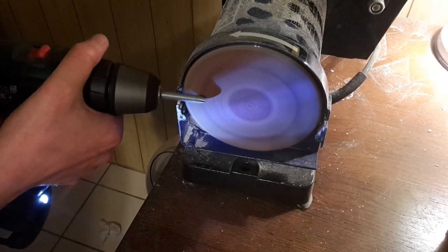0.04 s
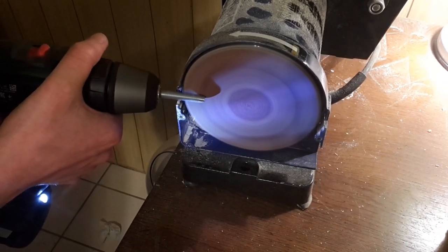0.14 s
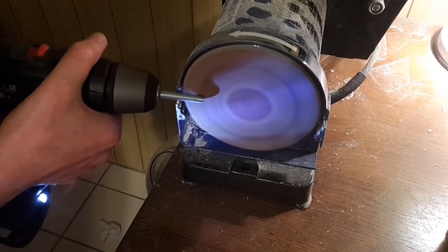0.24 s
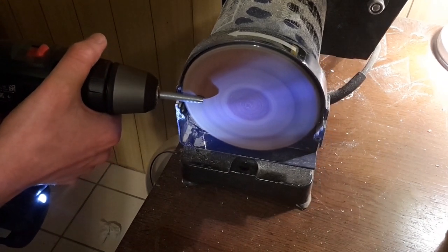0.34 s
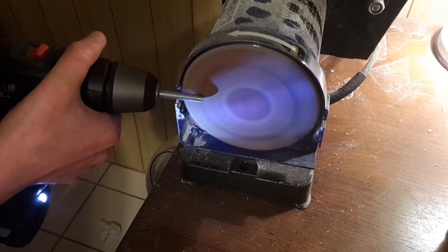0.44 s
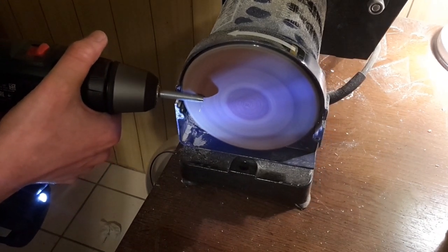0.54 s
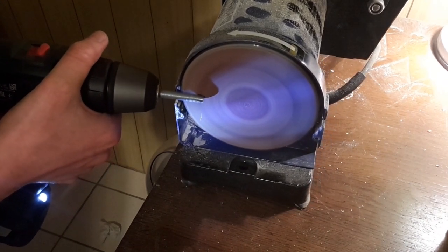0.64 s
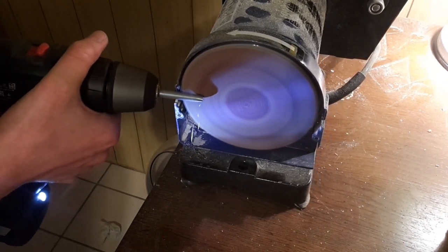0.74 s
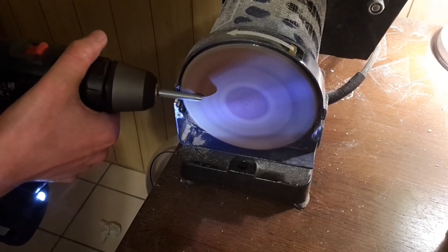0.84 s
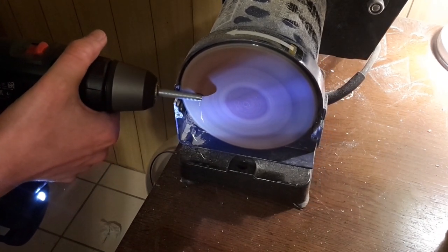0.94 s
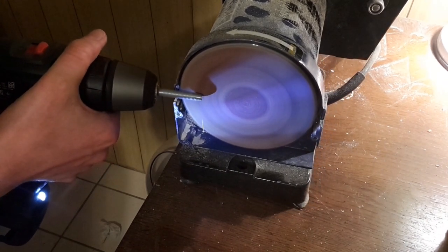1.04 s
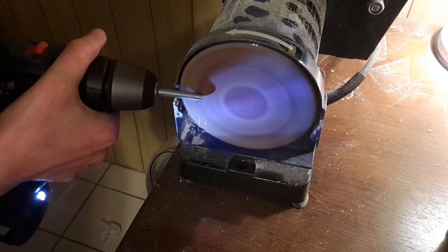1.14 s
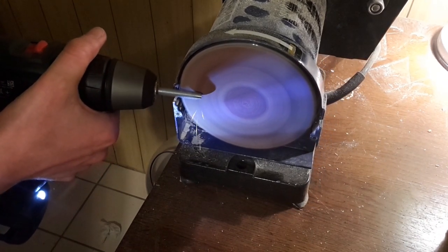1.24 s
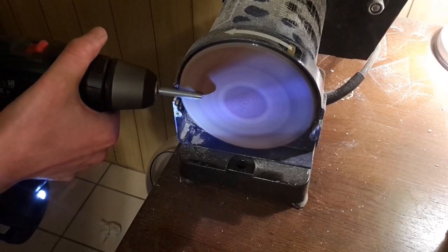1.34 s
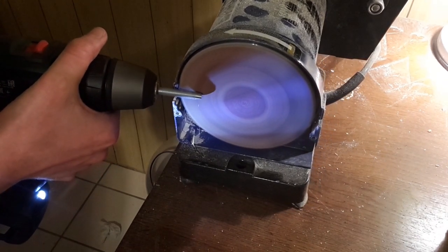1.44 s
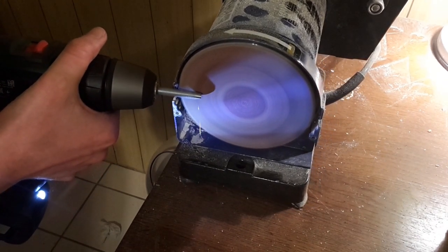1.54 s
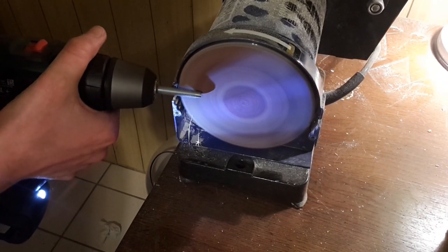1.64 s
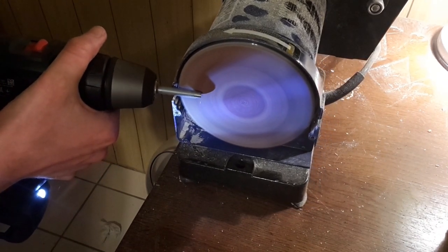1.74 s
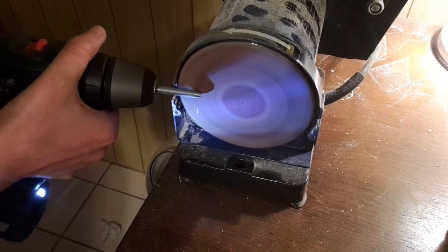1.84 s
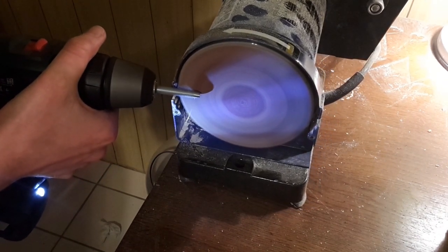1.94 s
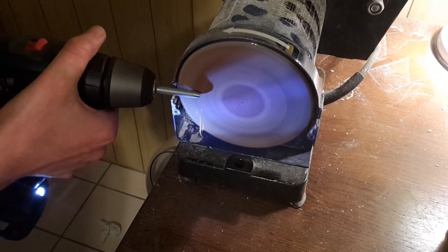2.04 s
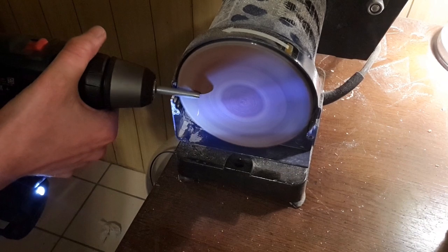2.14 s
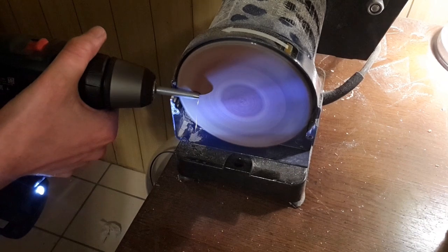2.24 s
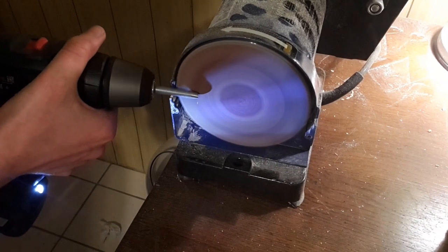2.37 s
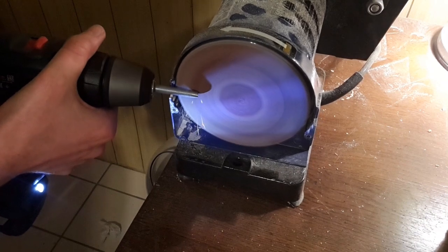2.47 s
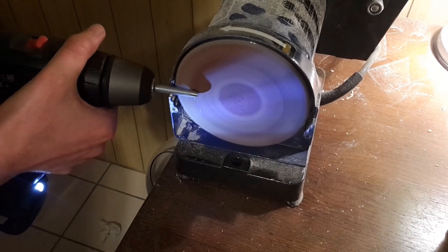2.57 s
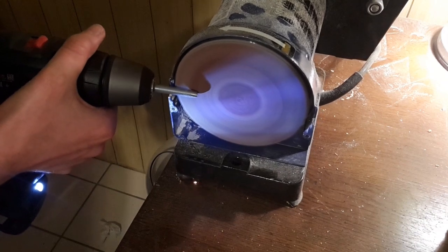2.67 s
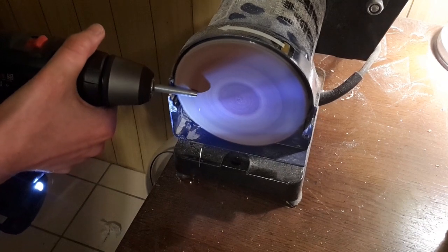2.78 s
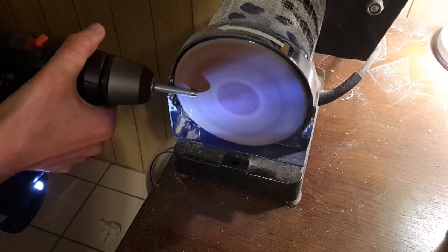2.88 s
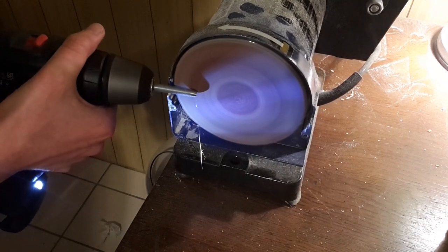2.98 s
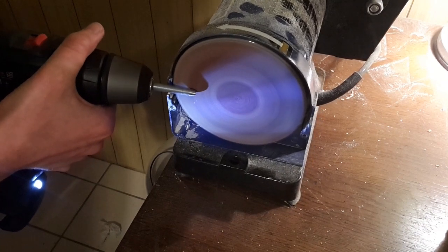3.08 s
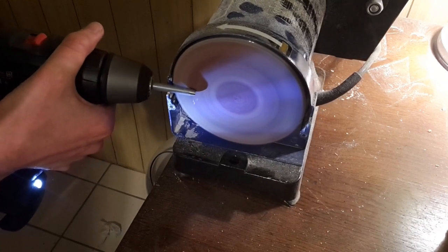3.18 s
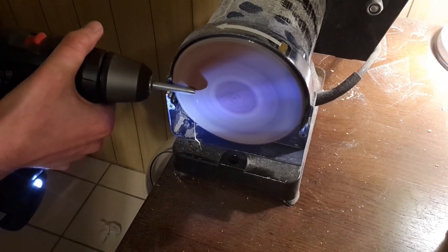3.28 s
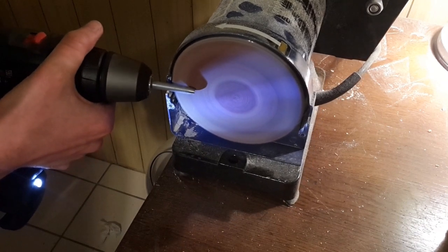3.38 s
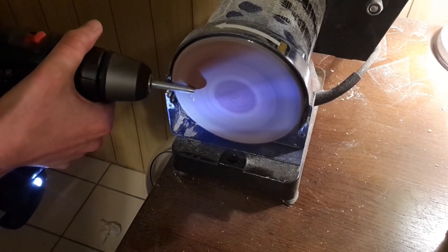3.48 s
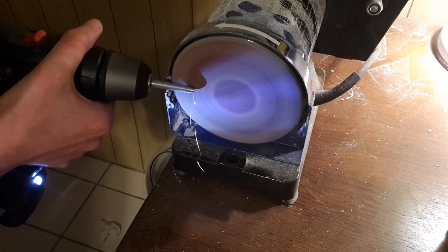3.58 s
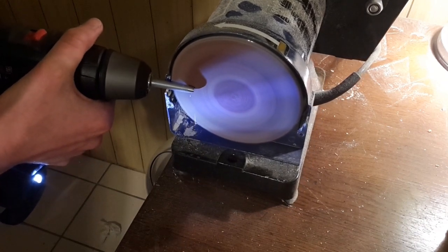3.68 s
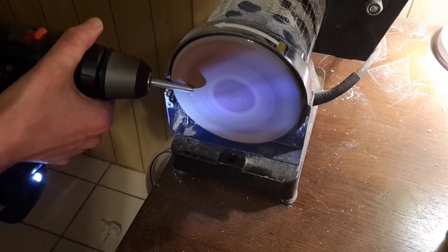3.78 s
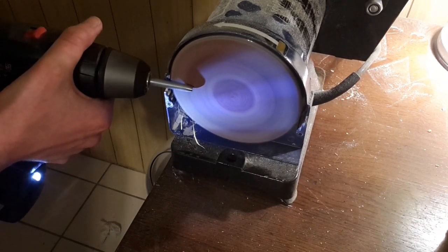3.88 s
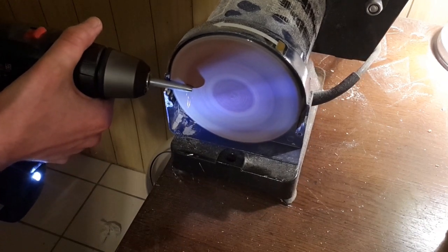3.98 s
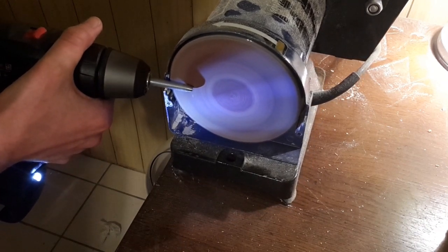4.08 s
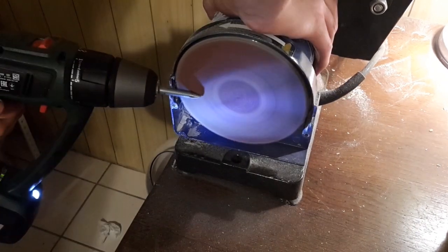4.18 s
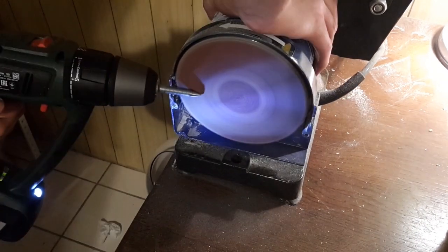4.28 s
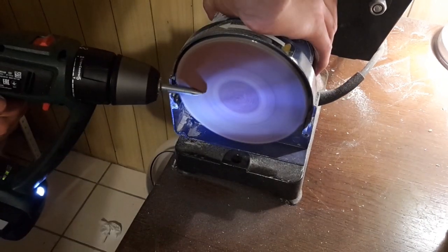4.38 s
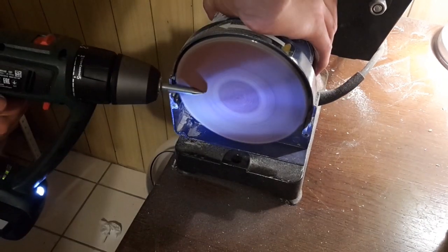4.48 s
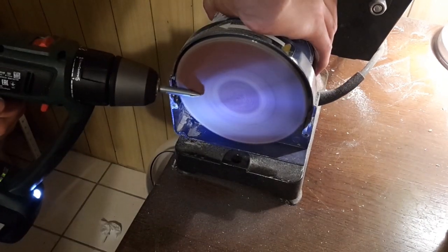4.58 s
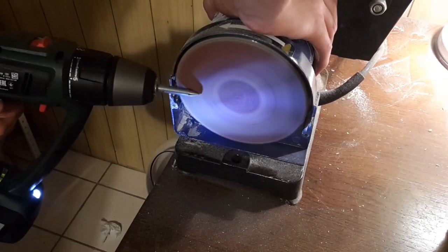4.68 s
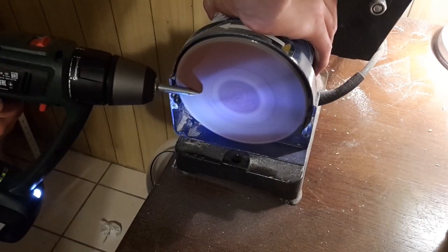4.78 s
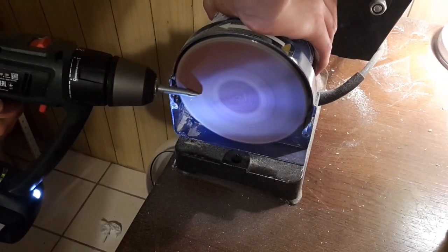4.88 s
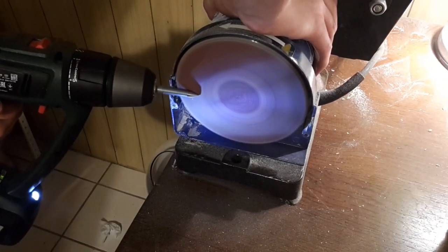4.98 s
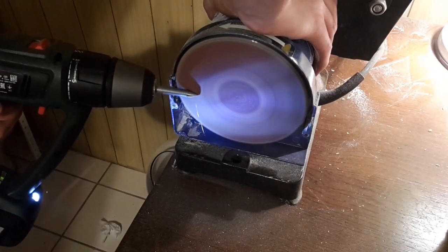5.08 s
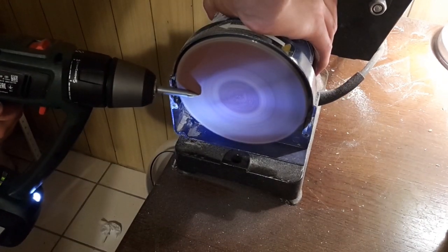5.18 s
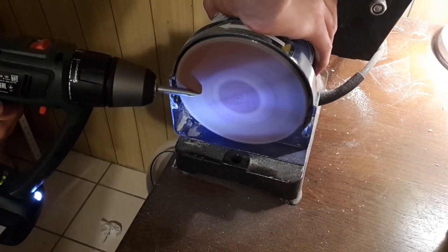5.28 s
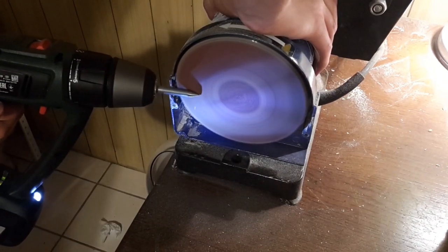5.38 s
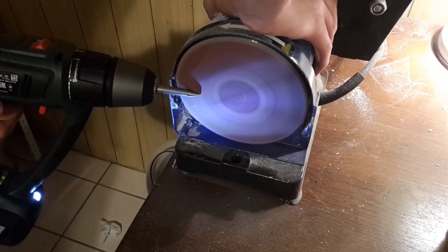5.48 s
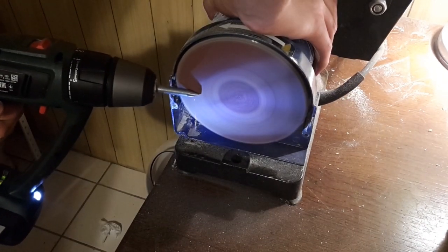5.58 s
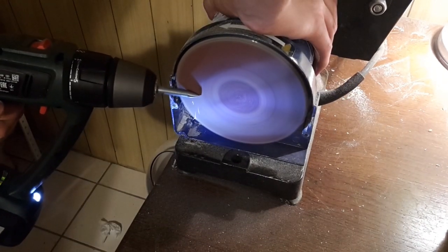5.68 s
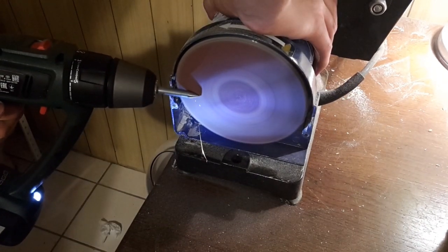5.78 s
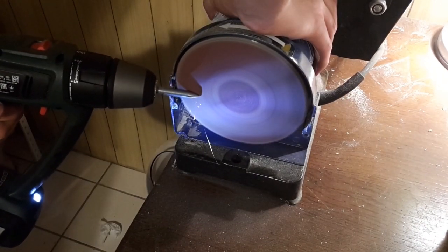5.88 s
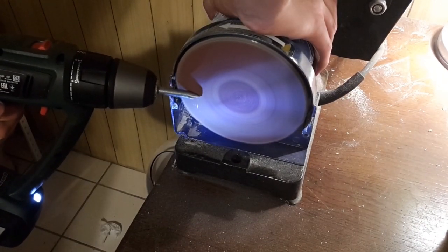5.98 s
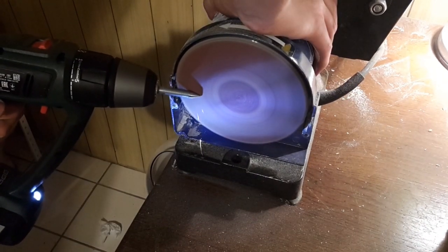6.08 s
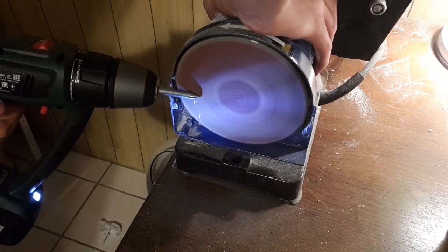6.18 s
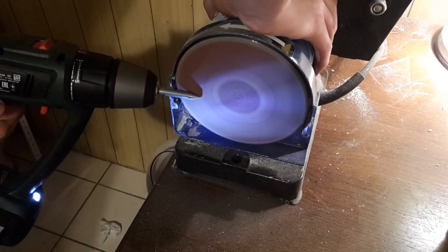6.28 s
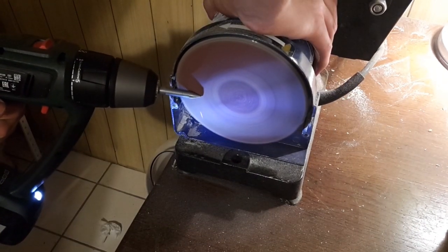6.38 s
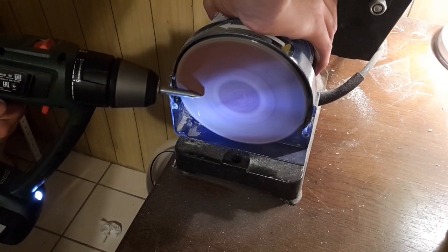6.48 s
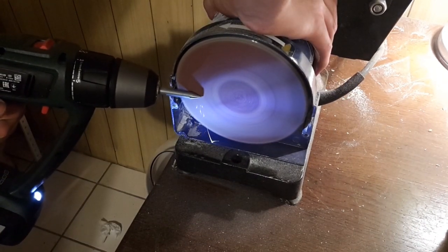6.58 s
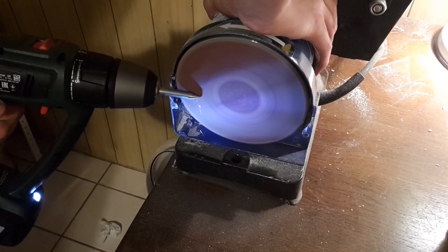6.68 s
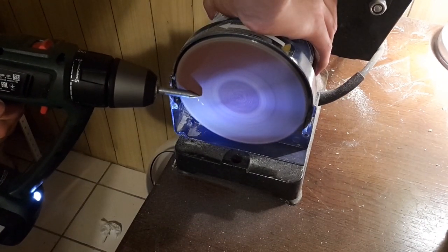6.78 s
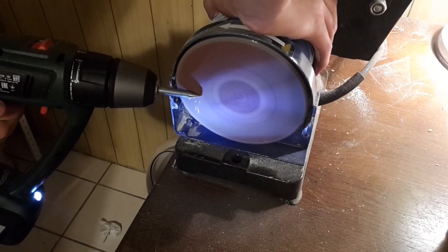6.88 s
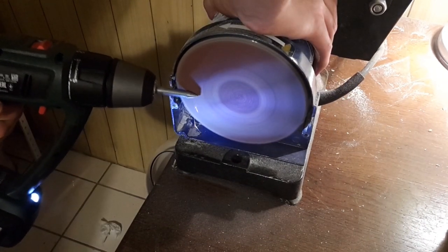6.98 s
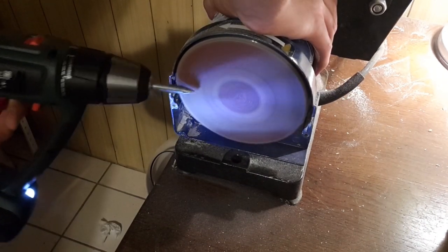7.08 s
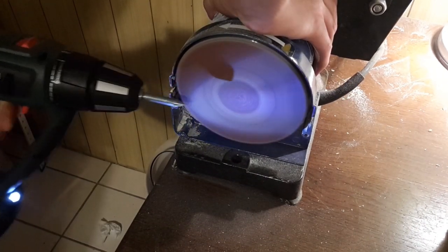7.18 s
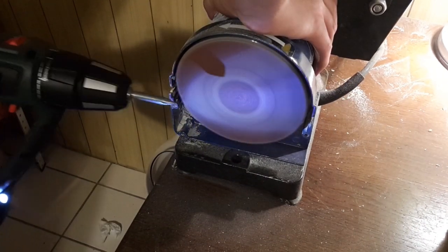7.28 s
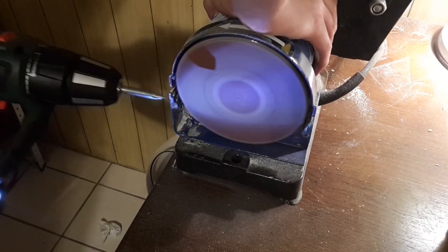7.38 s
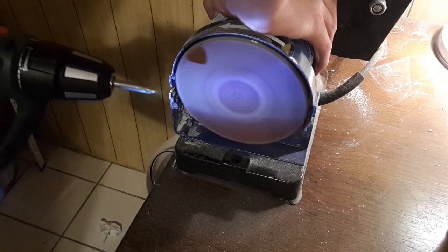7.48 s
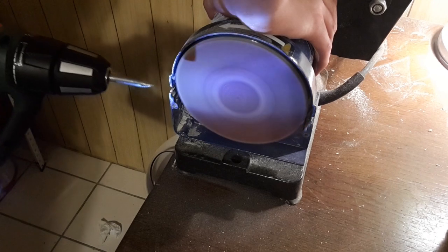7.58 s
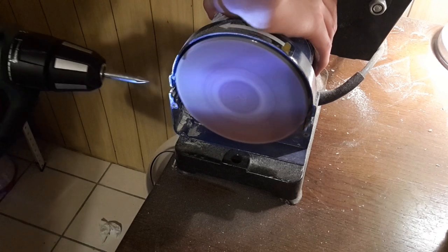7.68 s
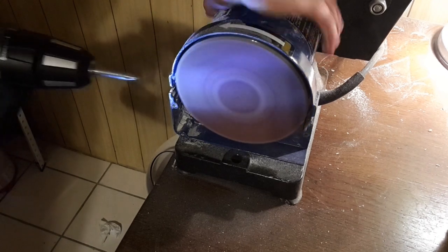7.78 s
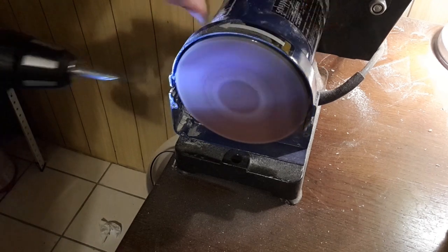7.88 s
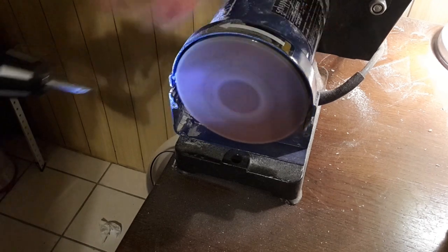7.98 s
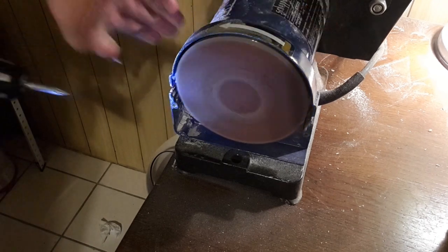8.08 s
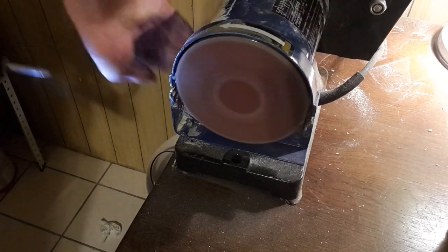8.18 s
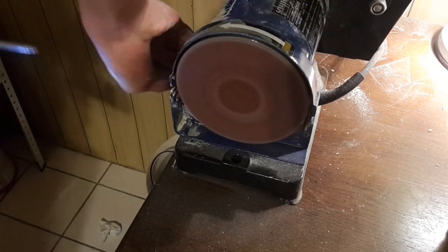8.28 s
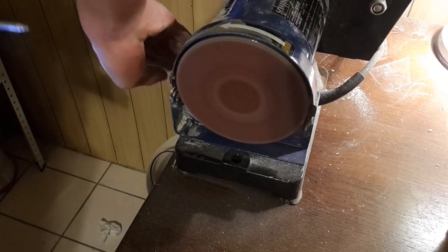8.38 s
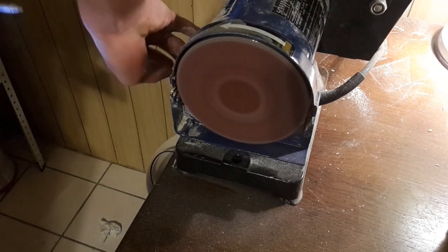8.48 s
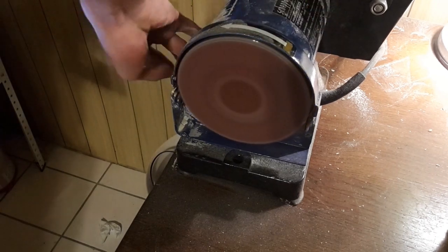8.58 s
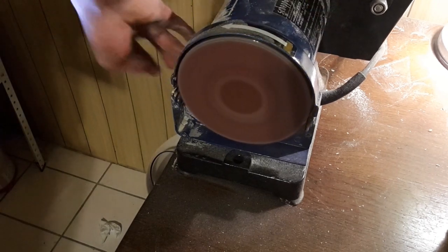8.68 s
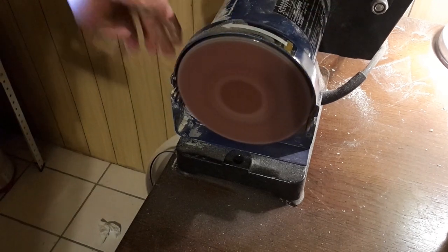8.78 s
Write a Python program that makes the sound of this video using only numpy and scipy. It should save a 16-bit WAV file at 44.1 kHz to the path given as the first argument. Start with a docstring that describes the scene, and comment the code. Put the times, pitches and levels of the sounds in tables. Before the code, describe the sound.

From the start, a steel rod turning in a hand drill grinds on a spinning sanding disc, close to a stereo microphone in a workshop. It makes a bright, steady hiss with a rapid pulse and a faint metallic ring, over a quiet motor hum. The tone shifts gradually between 2 and 3 seconds as the rod tilts. At about 4.1 seconds the hiss abruptly changes colour and flutters more roughly, settling by 5 seconds. At about 7.1 seconds the rod lifts off and the grinding dies away quickly. The sander's motor remains, quieter, with a low hum, a rattling housing and a hissing fan. These swell from about 7.9 seconds, with several brief surges of rattle between 8.2 and 8.7 seconds. At about 8.6 seconds the motor is switched off and just begins to run down.

```python
"""A bright, pulsing hiss, close to a stereo microphone in a workshop: a steel rod, turning in a hand
drill, is ground on a spinning sanding disc. The same grit passes the rod on every turn, so the hiss
half repeats; the grip changes once, then the rod lifts off. Behind it a motor hums, its housing
rattles and its fan hisses; they swell at the end and, switched off, start to run down."""
import sys
import numpy as np
from scipy import signal
from scipy.fft import irfft
from scipy.io import wavfile
from scipy.ndimage import map_coordinates

SR = 44100
rng = np.random.default_rng(int(sys.argv[2]) if len(sys.argv) > 2 else 0)


def master(y):
    """Save y as 16-bit WAV."""
    cut = np.clip(np.atleast_2d(y).T, -1, 1)
    pcm = np.round(cut * 32767)  # scale
    wavfile.write(sys.argv[1], SR, pcm.astype(np.int16))


N = 389403
REGRIP_S, LIFT_S, OFF_S = 4.12, 7.114, 8.62
SWELL_S, SWELL_LENGTH_S = 7.9, .42
FRAME, CUTOFF_HZ = 2048, 15730


def from_db(db):
    """Decibels to gain."""
    return 10 ** (np.asarray(db) / 20)


def rms_one(x):
    """Scale to rms 1."""
    return x / np.sqrt(np.mean(x ** 2) + 1e-20)


def in_time(rows):
    """Table columns as curves, one value a sample."""
    s, *columns = np.transpose(rows)
    return [np.interp(np.arange(N) / SR, s, c) for c in columns]


def ramp(start_s, length_s, s=None):
    """A straight rise from 0 to 1."""
    s = np.arange(N) / SR if s is None else s
    return np.clip((s - start_s) / length_s, 0, 1)


def since(start_s):
    """Seconds gone since a moment, 0 before it."""
    return np.maximum(np.arange(N) / SR - start_s, 0)


def bump(at_s, length_s):
    """A rounded hump of height 1."""
    return np.exp(-(2 * (np.arange(N) / SR - at_s) / length_s) ** 2)


def band(x, hz, kind="band"):
    """Filter without phase shift, so the band can be added or taken away."""
    return signal.sosfiltfilt(signal.butter(2, hz, kind, fs=SR, output="sos"), x)


def drift(rate_hz):
    """Slow random wander of spread 1."""
    pole = np.exp(-80 * np.pi * rate_hz / SR)
    slow = signal.lfilter([1], [1, -2 * pole, pole * pole], rng.standard_normal(N // 40 + 2002))[2000:]
    return np.interp(np.arange(N) / 40, np.arange(len(slow)), rms_one(slow))


def field(hz, s, step_hz, step_s):
    """Random wander over pitch and time."""
    grid = np.meshgrid(hz / step_hz, s / step_s, indexing="ij")
    return map_coordinates(rng.standard_normal((500, 200)), grid, order=1, mode="nearest")


def repeating(turns_per_s, share, keep, slip_us, wear_hz=17000):
    """Two noises that come round each turn; part wears away, timing slips, fresh noise mixes in."""
    turns, mean_hz = np.cumsum(turns_per_s) / SR, np.mean(turns_per_s)
    size, count = 4096, int(turns[-1]) + 12
    orders = np.arange(int(16500 / mean_hz))
    shape = (2, count, len(orders))   # a spectrum for every turn
    spectra = rng.standard_normal(shape) + 1j * rng.standard_normal(shape)
    worn = signal.lfilter([1], [1, -keep], spectra, axis=1) * np.sqrt(1 - keep ** 2)
    lasting = 1 / (1 + (orders * mean_hz / wear_hz) ** 2)   # fine detail wears fastest
    worn = (np.sqrt(lasting) * worn + np.sqrt(1 - lasting) * np.roll(spectra, 100, axis=1))[:, 10:]
    slip_turns = np.cumsum(rng.standard_normal(count - 10)) * slip_us * 1e-6 * mean_hz
    tracks = irfft(worn * np.exp(2j * np.pi * orders * slip_turns[:, None]), size).reshape(2, -1)
    repeated = np.array([rms_one(np.interp(turns * size, np.arange(len(t)), t)) for t in tracks])
    fresh = rng.standard_normal((2, N)) * np.sqrt(SR / 33000)
    return np.sqrt(share) * repeated + np.sqrt(1 - share) * fresh


def colour(slope, rings):
    """Left-right gains of mean power 1: a broad slope plus rounded resonances."""
    hz, slope = np.maximum(np.fft.rfftfreq(FRAME, 1 / SR), 10), np.array(slope)
    power = from_db([np.interp(np.log(hz), np.log(slope[:, 0]), db) for db in slope.T[1:]]) ** 2
    for centre_hz, width_hz, *db in rings:
        power += from_db(db)[:, None] ** 2 / (1 + (2 * (hz - centre_hz) / width_hz) ** 2) ** 2
    power = power.reshape(-1, 2, len(hz), 1)
    return np.sqrt(power / np.mean(power[:, :, hz < CUTOFF_HZ], axis=(1, 2, 3), keepdims=True))


def likeness(table, hz, s):
    """Left-right likeness, 1 in step, -1 opposed; the last column holds after the regrip."""
    table = np.array(table)
    first, last = (np.interp(np.log(hz + 10), np.log(table[:, 0]), table[:, k]) for k in (1, -1))
    return np.where(s < REGRIP_S, first[:, None], last[:, None])


def at_microphone(pair, gain, ports_alike, patchy_db, patch_hz, patch_s, echo_share):
    """Colour a noise for the two ports; walls add it again, about a quarter cycle early or late."""
    frames = dict(fs=SR, nperseg=FRAME, noverlap=FRAME * 3 // 4)
    hz, s, (mid, other) = signal.stft(pair, **frames)
    alike = likeness(ports_alike, hz, s)
    quarter_cycle = 1j * np.sign(field(hz, s, step_hz=250, step_s=9))
    echo = mid * quarter_cycle * np.exp(.3j * field(hz, s, step_hz=90, step_s=4))
    side = np.sqrt(echo_share) * echo + np.sqrt(1 - echo_share) * other
    ports = np.array([np.sqrt(1 + alike) * mid + sign * np.sqrt(1 - alike) * side for sign in (1, -1)])
    ports = ports * gain(hz, s) * from_db(patchy_db * field(hz, s, patch_hz, patch_s))
    return rms_one(signal.istft(ports, **frames)[1][:, :N])


# Broad colour of the motor at the microphone: f/Hz, left and right relative level/dB
HOUSING_COLOUR = [(300, -14.0, -11.0), (600, -13.0, -13.0), (1300, -13.0, -12.0), (2600, -16.0, -16.0),
                  (3800, -20.0, -18.0), (5600, -25.0, -20.0), (6500, -26.0, -22.0), (8000, -21.0, -18.0),
                  (9000, -14.0, -15.0), (9900, -6.0, -10.0), (10900, -10.0, -13.0), (12200, -12.0, -12.0),
                  (13000, -19.0, -15.0), (15600, -19.0, -16.0)]
# Its resonances: f/Hz, width/Hz, left and right relative level/dB
HOUSING_RINGS = [(500, 60, -4, -2), (764, 110, -2, 1.5), (868, 35, -9, -5), (1022, 110, -7, -5),
                 (1095, 45, -6, -3), (1564, 200, -12, -8), (2050, 250, -16, -11), (3050, 90, -10, -10),
                 (3440, 130, -14, -11), (4780, 200, -21, -23), (5800, 300, -25, -19), (9150, 200, -20, -13)]
# The motor across the two ports: f/Hz, likeness
HOUSING_LIKENESS = [(60, 0.98), (150, 0.88), (380, 0.58), (950, 0.64), (2380, 0.058), (5980, 0.0062),
                    (15000, 0.19)]
def housing(noise, tilt, **room):
    """A noise, weighted by tilt(hz), takes on the resonances of the motor."""
    body = colour(HOUSING_COLOUR, HOUSING_RINGS)[0]
    return at_microphone(noise, lambda hz, s: body * tilt(hz)[:, None], HOUSING_LIKENESS, **room)


def rattle_share(hz, crossover_hz=2440):
    """Share of power at each pitch: rattle below the crossover, fan above."""
    return 1 / (1 + (hz / crossover_hz) ** 4)


def fan():
    """Air hisses through the fan, swells, and fades after switch-off."""
    air = rng.standard_normal((2, N)) * from_db(.98 * drift(30))
    hiss = housing(air, lambda hz: np.sqrt(1 - rattle_share(hz)),
                   patchy_db=1.5, patch_hz=296, patch_s=.2, echo_share=.2)
    return from_db(-54.5 + 12 * ramp(SWELL_S, SWELL_LENGTH_S) - 3.5 * since(OFF_S)) * hiss


# Brief surges of the rattle: t/s, rise/dB, length/s
RATTLE_SURGES = [(8.25, 3, .03), (8.372, 4.5, .035), (8.447, 6, .065), (8.55, 6.5, .07), (8.618, 6.5, .045),
                 (8.655, 4, .03)]
def rattle(hum_hz, angle, level_db, bottom_hz=300):
    """The housing's rattle partly repeats at half the hum pitch and throbs at an eighth."""
    throb = from_db(.5 * np.sin(angle / 8 + .079) + 1.43 * drift(14))
    shaking = throb * repeating(hum_hz / 2, share=.28, keep=.49, slip_us=56.7)
    rattling = housing(shaking, lambda hz: np.sqrt(rattle_share(hz)) * hz / np.hypot(hz, bottom_hz),
                       patchy_db=.8, patch_hz=118, patch_s=.37, echo_share=.39)
    surge_db = sum(db * bump(s, length_s) for s, db, length_s in RATTLE_SURGES)
    return from_db(level_db + surge_db) * rattling


# Partials around the hum's fundamental: multiple of its pitch, relative level/dB
MOTOR_PARTIALS = [(.61, -17), (1.57, -1), (2.0, -2), (2.13, -4), (3.0, -4), (4.0, -4), (5.0, -4), (6.0, 4)]
def hum(angle, fundamental_db, partials_db, waver_rad=.6, fade_db_per_s=25):
    """The motor hums in wavering partials, a little to the right, and fades after switch-off."""
    partials = 0
    for multiple, db in MOTOR_PARTIALS:
        gain = from_db(db + drift(5.2) + 2.7 * drift(8.7))
        partials += gain * np.sin(multiple * angle + waver_rad * drift(8.8) + rng.uniform(0, 2 * np.pi))
    fundamental = from_db(fundamental_db + .58 * drift(5.5)) * np.sin(angle)
    fade = from_db(-fade_db_per_s * since(OFF_S))
    return (fundamental + from_db(partials_db) * partials) * fade * from_db([[-1.2], [1.2]])


# The shaking grows, is damped by a hand on the housing, then runs free:
# t/s, level/dB before the swell of rattle, hum fundamental, other partials
MOTOR_SHAKING = [(0, -66.5, -82, -99), (1.2, -60.5, -76, -90), (2.2, -60, -71, -84),
                 (3.1, -60.5, -71.5, -76.5), (4.1, -55.5, -73, -77.5), (4.27, -59.5, -89, -84),
                 (4.8, -66, -92, -82.5), (5.6, -69.5, -85.5, -83), (7.1, -64.5, -84, -87),
                 (7.19, -57, -74, -70.5), (7.86, -57, -69, -66.5)]
def motor(loaded_hz=87.4, free_hz=87.93, sag_hz_per_s=38):
    """The background: the motor speeds up slightly as the rod lifts, swells, then runs down."""
    rattle_db, fundamental_db, partials_db = in_time(MOTOR_SHAKING)
    hum_hz = loaded_hz + (free_hz - loaded_hz) * ramp(LIFT_S, .146) - sag_hz_per_s * since(OFF_S)
    angle = 2 * np.pi * np.cumsum(hum_hz) / SR
    swell = ramp(SWELL_S, SWELL_LENGTH_S)
    humming = hum(angle, fundamental_db + 11.5 * swell, partials_db + 7.5 * swell)
    return humming + rattle(hum_hz, angle, rattle_db + 10 * swell) + fan()


# Tones of the loaded disc motor: multiple of the turn rate, level/dB
LOAD_TONES = [(8, -76), (9, -79), (15, -76), (16, -72), (23, -83), (24, -87), (26, -73), (27, -93)]
def load_tones(angle):
    """The disc motor sings faintly under load, until the rod lifts."""
    tones = sum(from_db(db + 1.2 * drift(3)) * np.sin(multiple * angle + rng.uniform(0, 2 * np.pi))
                for multiple, db in LOAD_TONES)
    return tones * (1 - ramp(LIFT_S, .19)) * from_db([[-1.1], [1.1]])


# Strength of the high spot's blows: t/s, level/dB
BLOW_LEVELS = [(0, -52), (1.4, -48.5), (2.8, -59), (4.14, -59), (4.66, -51), (4.8, -75)]
def high_spot(turns, rod_hz=4925, t60_s=.035, strike_turn=.55):
    """A high spot of the disc strikes once a turn, unevenly, and rings one short mode of the rod."""
    at = np.flatnonzero(np.diff(np.floor(turns - strike_turn)))
    late_samples, uneven_db = 1.1 * rng.standard_normal((len(at), 2)).T
    blows = np.full(N, 1e-18)
    blows[np.clip(at + np.round(late_samples).astype(int), 0, N - 1)] = from_db(uneven_db)
    decay, step = from_db(-60 / (t60_s * SR)), 2 * np.pi * rod_hz / SR
    ring = signal.lfilter([0, np.sin(step)], [1, -2 * decay * np.cos(step), decay ** 2], blows)
    build_up = signal.butter(1, [rod_hz - 150, rod_hz + 150], "band", fs=SR, output="sos")
    return from_db(in_time(BLOW_LEVELS)[0]) * signal.sosfilt(build_up, ring) * from_db([[-1.5], [1.5]])


# Broad colour of rod and disc at the microphone, in each grip:
# f/Hz, relative level/dB for shallow left, shallow right, steep left, steep right
FIRST_GRIP_COLOUR = [(130, -41, -39, -41, -39), (300, -50.0, -49.0, -50.0, -39.0),
                     (1200, -43.0, -48.0, -33.0, -32.0), (2400, -29.0, -30.0, -26.0, -26.0),
                     (3900, -24.0, -24.0, -31.0, -35.0), (5000, -23.0, -18.0, -20.0, -15.0),
                     (6000, -30.0, -29.0, -33.0, -26.0), (7200, -27.0, -31.0, -24.0, -29.0),
                     (8200, -15.0, -10.0, -21.0, -14.0), (9000, -17.0, -12.0, -16.0, -7.0),
                     (9700, -38.0, -50.0, -30.0, -36.0), (11000, -5.0, -11.0, -1.0, -12.0),
                     (12400, -14.0, -20.0, -17.0, -18.0), (13600, -22.0, -13.0, -12.0, -13.0),
                     (14600, -13.0, -20.0, -20.0, -19.0), (15600, -17.0, -15.0, -12.0, -11.0)]
SECOND_GRIP_COLOUR = [(130, -41, -39, -41, -39), (300, -47.0, -38.0, -50.0, -50.0),
                      (1200, -34.0, -39.0, -39.0, -44.0), (2400, -27.0, -28.0, -30.0, -30.0),
                      (3900, -26.0, -21.0, -26.0, -23.0), (5000, -38.0, -24.0, -31.0, -25.0),
                      (6000, -30.0, -33.0, -41.0, -50.0), (7200, -24.0, -20.0, -27.0, -23.0),
                      (8200, -18.0, -19.0, -20.0, -21.0), (9000, -17.0, -8.0, -18.0, -8.0),
                      (9700, -7.0, -14.0, -7.0, -15.0), (11000, -10.0, -14.0, -12.0, -17.0),
                      (12400, -14.0, -15.0, -11.0, -12.0), (13600, -14.0, -12.0, -16.0, -13.0),
                      (14600, -17.0, -13.0, -17.0, -12.0), (15600, -14.0, -12.0, -16.0, -14.0)]
# Their resonances: f/Hz, width/Hz, the same four of level/dB
FIRST_GRIP_RINGS = [(380, 100, -30.0, -29.0, -26.0, -27.0), (510, 100, -31.0, -31.0, -27.0, -31.0),
                    (760, 130, -32.0, -25.0, -28.0, -16.0), (1020, 210, -49.0, -48.0, -18.0, -18.0),
                    (1170, 280, -25.0, -23.0, -26.0, -25.0), (1980, 460, -26.0, -30.0, -25.0, -27.0),
                    (3150, 600, -27.0, -22.0, -23.0, -21.0), (3520, 290, -45.0, -17.0, -21.0, -15.0),
                    (3880, 210, -42.0, -43.0, -18.0, -18.0), (4150, 230, -20.0, -21.0, -20.0, -17.0),
                    (4550, 150, -18.0, -22.0, -18.0, -19.0), (4930, 140, -14.0, -13.0, -21.0, -28.0),
                    (5630, 110, -45.0, -24.0, -22.0, -17.0), (5810, 170, -30.0, -45.0, -20.0, -27.0),
                    (6050, 110, -28.0, -26.0, -22.0, -24.0), (6340, 150, -19.0, -28.0, -22.0, -22.0),
                    (6520, 280, -24.0, -18.0, -25.0, -25.0), (6930, 450, -24.0, -21.0, -22.0, -16.0),
                    (7470, 240, -39.0, -19.0, -26.0, -18.0), (8390, 110, -37.0, -5.0, -18.0, -6.0),
                    (9430, 320, -7.0, -8.0, -12.0, -12.0), (9780, 420, -5.0, -14.0, -1.0, -9.0),
                    (9810, 90, -30, -30, 2, -6), (10240, 310, -33.0, -11.0, -4.0, -14.0),
                    (10420, 90, 2, -8, -30, -30), (10520, 530, -0.0, -11.0, -17.0, -12.0),
                    (12000, 320, -6.0, -11.0, -40.0, -41.0), (12430, 590, -20.0, -15.0, -16.0, -17.0),
                    (13170, 600, -9.0, -38.0, -16.0, -44.0), (14210, 180, -20.0, -14.0, -27.0, -14.0),
                    (14780, 80, -12.0, -19.0, -13.0, -36.0), (15020, 330, -22.0, -16.0, -13.0, -40.0)]
SECOND_GRIP_RINGS = [(390, 100, -27.0, -28.0, -30, -30), (520, 90, -29.0, -25.0, -38.0, -35.0),
                     (710, 250, -47.0, -28.0, -41.0, -31.0), (770, 70, -25.0, -19.0, -34.0, -37.0),
                     (1060, 290, -21.0, -24.0, -32.0, -48.0), (1230, 380, -36.0, -28.0, -25.0, -25.0),
                     (2080, 140, -35.0, -25.0, -32.0, -28.0), (2760, 220, -31.0, -23.0, -31.0, -23.0),
                     (3040, 130, -23.0, -22.0, -24.0, -30.0), (3440, 250, -15.0, -15.0, -23.0, -28.0),
                     (4060, 170, -22.0, -13.0, -45.0, -17.0), (4340, 130, -40.0, -21.0, -26.0, -19.0),
                     (4820, 450, -17.0, -19.0, -25.0, -42.0), (5250, 350, -25.0, -19.0, -22.0, -20.0),
                     (5560, 190, -20.0, -15, -20.0, -14.0), (5880, 150, -22.0, -25.0, -20.0, -23.0),
                     (6020, 50, -22.0, -19.0, -23.0, -23.0), (6550, 200, -32.0, -17.0, -24.0, -16.0),
                     (6880, 400, -27.0, -15.0, -32.0, -20.0), (7100, 170, -26.0, -19.0, -17.0, -12.0),
                     (7490, 190, -26.0, -20.0, -18.0, -17.0), (7890, 150, -21.0, -13.0, -44.0, -15.0),
                     (8410, 120, -36.0, -12.0, -18.0, -16.0), (9200, 240, -9, -13, -6, -8),
                     (10450, 70, -6, -20, 0, -16), (10480, 580, -6.0, -34.0, -3.0, -20.0),
                     (11040, 530, -5.0, -13.0, -5.0, -10.0), (11370, 80, -7.0, -11.0, -8.0, -13.0),
                     (12200, 460, -7.0, -35.0, -9.0, -38.0), (14910, 390, -16.0, -15.0, -36.0, -12.0)]
# Each grip starts shallow (0) and tilts towards steep (1) or back: t/s, length/s, change
ROD_TILTS = [(1.8, 1.0, 1), (4.66, .24, 1), (6.35, .25, -.4), (7.1, .05, -.6)]
def grip_colour(hz, s):
    """Tilting the rod blends the shallow and steep colours of whichever grip holds."""
    steep = sum(change * ramp(start_s, length_s, s) * ((start_s < REGRIP_S) == (s < REGRIP_S))
                for start_s, length_s, change in ROD_TILTS)
    first = colour(FIRST_GRIP_COLOUR, FIRST_GRIP_RINGS)
    second = colour(SECOND_GRIP_COLOUR, SECOND_GRIP_RINGS)
    shallow_gain, steep_gain = np.where(s < REGRIP_S, first, second)
    return shallow_gain ** (1 - steep) * steep_gain ** steep


EASE_OFF_S = .06
# Pressure of the rod, heard as loudness: t/s, level/dB
ROD_PRESSURE = [(0.0, -37.5), (0.68, -35.5), (2.27, -35.5), (3.7, -37), (4.26, -37.5), (4.8, -36.5),
                (5.87, -39), (7.1, -38)]
# The level dips or jumps briefly: t/s, change/dB, length/s
LEVEL_JOLTS = [(0.717, -4, 0.027), (0.84, -1.5, .1), (1.396, -3, 0.036), (2.38, -1.5, 0.089),
               (4.476, -2, 0.14), (4.74, -1.5, .05), (7.112, 2.3, .012), (7.1725, 8, .007)]
def contact(second_grip, settle_s=.7, loose_share=.27, room_db_per_s=118):
    """Held loosely after the regrip and before the lift, the rod bounces more and less grit repeats."""
    loose = second_grip * (1 - ramp(REGRIP_S, settle_s))
    easing = ramp(LIFT_S - EASE_OFF_S, EASE_OFF_S)
    firm_share = np.where(second_grip, .48, .8)
    share = firm_share + (loose_share - firm_share) * np.sqrt(np.maximum(loose, easing))
    bounce_db = (.55 + 1.75 * loose + 5.5 * easing) * (1 - ramp(LIFT_S, .017))
    jolt_db = sum(db * bump(s, length_s) for s, db, length_s in LEVEL_JOLTS)
    # at the lift the hiss drops at once, then dies away in the room
    lift_db = 3 * easing + 1.5 * ramp(LIFT_S + .0033, .0067) + room_db_per_s * since(LIFT_S)
    return share, bounce_db, in_time(ROD_PRESSURE)[0] + jolt_db - lift_db


def rasp_and_sizzle(hiss, angle, second_grip, rasp_hz=(2900, 4150), sizzle_hz=(8600, 9600)):
    """The rasp chatters four times a turn; in the second grip it calms and the sizzle beats each turn."""
    beat = .22 * second_grip * np.sin(angle + 2.9)
    chatter = 1 + np.where(second_grip, .075, .3) * np.sin(4 * angle + 1.2 * drift(1.5))
    thinning = from_db(-4 * bump(LIFT_S - EASE_OFF_S / 2, EASE_OFF_S))   # as the rod eases off
    return hiss + band(hiss, sizzle_hz) * beat + band(hiss, rasp_hz) * (thinning * chatter - 1)


# The grinding across the two ports: f/Hz, likeness in the first grip, in the second
HISS_LIKENESS = [(370, .9, .8), (560, .2, .5), (780, .9, .9), (1080, .4, .2), (1600, .5, .5),
                 (1900, -.1, .2), (2450, .4, -.2), (2890, 0, -.3), (3010, .4, .7), (3230, .3, -.1),
                 (3380, .4, .5), (3900, -.7, 0), (4090, -.8, -.3), (4350, .4, -.3), (4480, .8, .4),
                 (4650, .6, -.4), (4840, .8, .6), (5030, .7, .3), (5250, -.3, -.3), (5750, 0, .1),
                 (5840, -.5, -.8), (6010, .4, -.1), (6760, -.6, -.5), (7600, 0, 0), (8200, -.8, .3),
                 (8870, -.1, -.3), (9070, .1, .6), (9800, .6, .3), (10150, -.1, -.1), (10400, .7, .1),
                 (10620, 0, -.2), (12270, .4, .3), (13250, -.5, 0), (13950, .4, .2), (14300, -.3, 0)]
def grinding(turns_per_s, angle):
    """Grit tears at the rod; the disc runs out of true, so pressure bounces; the hand trembles."""
    second_grip = since(REGRIP_S) > 0
    share, bounce_db, level_db = contact(second_grip)
    grit = repeating(turns_per_s, share, keep=.92, slip_us=16)
    # coarse grains chatter on the rod in the same order each turn
    coarse = band(grit, 6000, "low")
    chatter = np.sin(angle + 6.3) + np.sin(2 * angle + 4.6) + .52 * np.sin(3 * angle + 5.1)
    grit = grit - coarse + coarse * from_db(.4 * chatter)
    bounce = np.sin(angle) + .43 * np.sin(2 * angle + 1.1) + .33 * np.sin(4 * angle + 1.9)
    tremble_db = .3 * drift(17) + .16 * drift(6)
    hiss = at_microphone(grit * from_db(bounce_db * bounce + tremble_db), grip_colour, HISS_LIKENESS,
                         patchy_db=2.6, patch_hz=45, patch_s=1.6, echo_share=.3)
    return from_db(level_db) * rasp_and_sizzle(hiss, angle, second_grip)


# Turn rate of the disc, sagging under the rod: t/s, f/Hz
DISC_SPEED = [(0, 48.64), (1.8, 48.62), (2.4, 48.49), (3.6, 48.55), (4.8, 48.47), (6.0, 48.13),
              (7.08, 48.05)]
def sanding_disc(start_turn=.62):
    """The foreground: the disc's turning paces the grinding, the load tones and the blows."""
    turns_per_s, = in_time(DISC_SPEED)
    turns = np.cumsum(turns_per_s) / SR
    angle = 2 * np.pi * (start_turn + turns)
    return grinding(turns_per_s, angle) + load_tones(angle) + high_spot(turns)


def scene():
    """The rod on the disc in front, the motor behind."""
    return sanding_disc() + motor()


def record(dry):
    """The microphone thins the deep bass and cuts the top."""
    thin = signal.sosfilt(signal.butter(2, 60, "high", fs=SR, output="sos"), dry)
    return signal.sosfilt(signal.ellip(14, .3, 90, CUTOFF_HZ, fs=SR, output="sos"), thin)


dry = scene()
out = record(dry)
master(out)
```